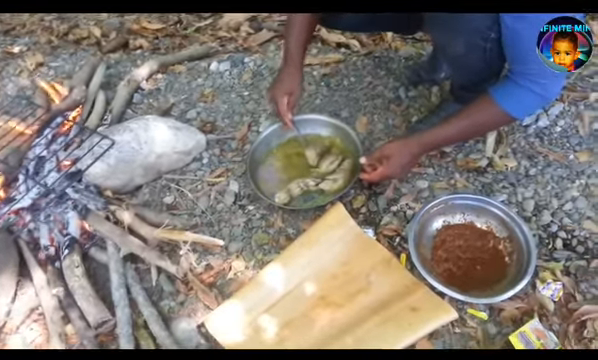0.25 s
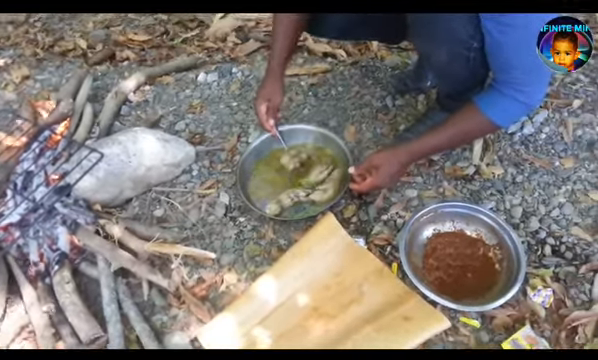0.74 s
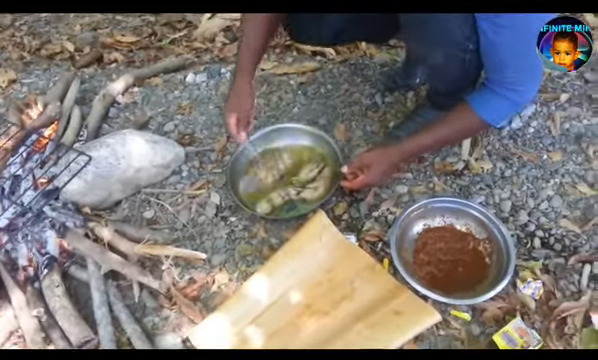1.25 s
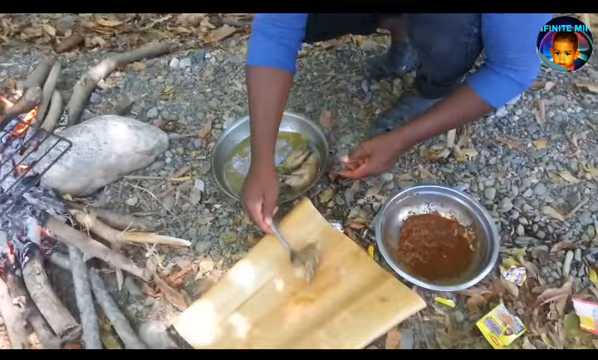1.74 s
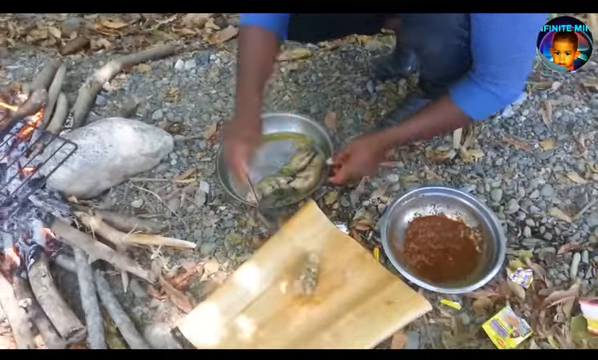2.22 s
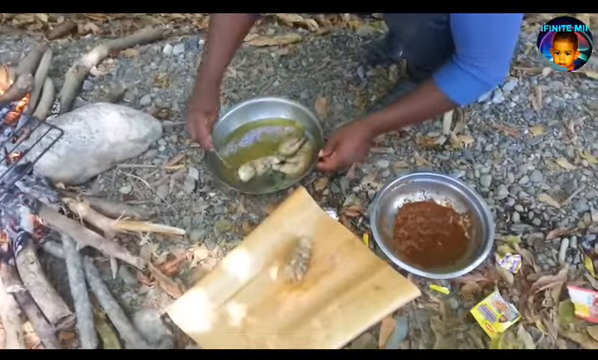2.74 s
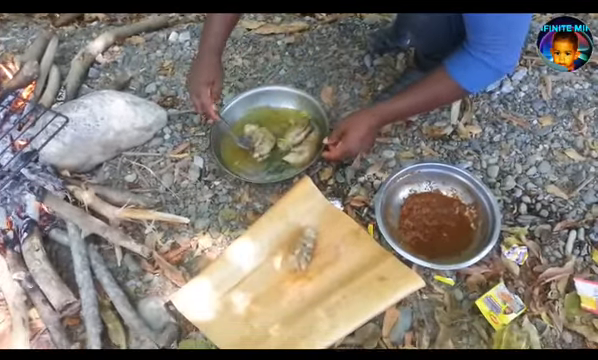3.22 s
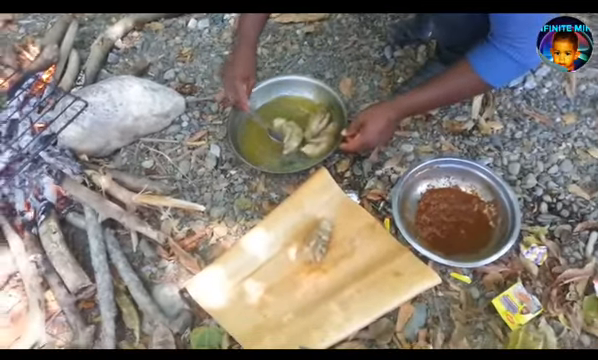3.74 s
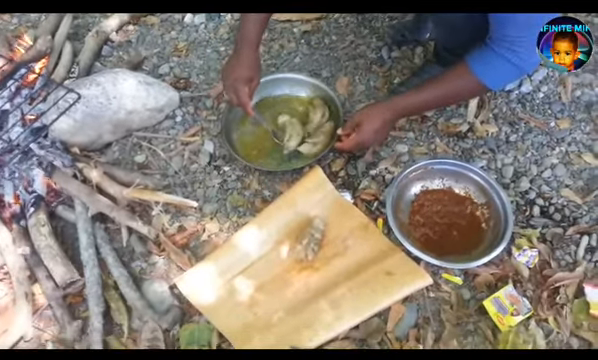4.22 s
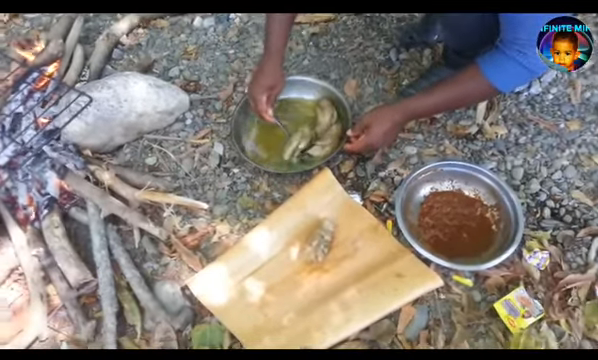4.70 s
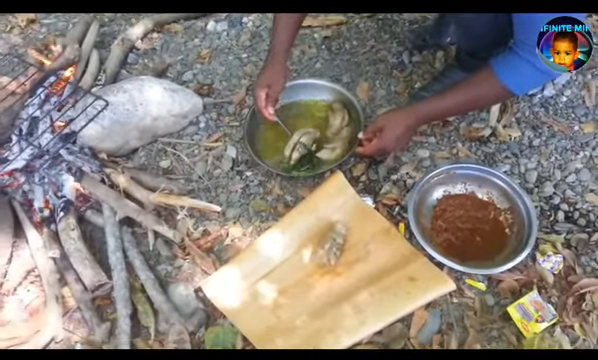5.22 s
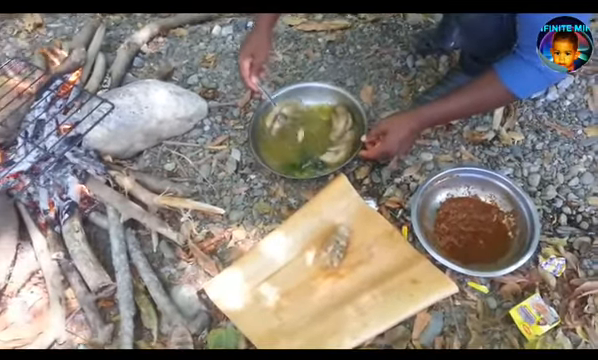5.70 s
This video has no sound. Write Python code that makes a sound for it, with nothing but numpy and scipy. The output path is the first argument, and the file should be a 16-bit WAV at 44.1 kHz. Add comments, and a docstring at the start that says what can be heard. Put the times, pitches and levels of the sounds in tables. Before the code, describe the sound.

Close stereo camera microphone, open air with faint scattered echoes. Early two-part bird whistles and small grip pops give way to a fork scraping and dull knocks as meat is set on wood. Short metallic bowl taps follow between two and a half and five seconds, with sparse dry fire crackles. Rough rubbing and one heavy handling knock sit hard left near the end, before raspy chirps.

```python
"""First a bird whistles up and down over a low outdoor rumble, and handling pops crackle on the left.
By a wood fire, a fork lifts cooked pork from a metal bowl of broth onto a board and goes back to stir.
Metal and wood ring as short fading sine waves, scrapes and rubbing are shaped noise, and birds are
gliding tones with echoes. The fire snaps as its splinters ring.
A noise suppressor lets the background swell up around the other sounds and sink between them."""
import sys
import numpy as np
from scipy import signal
from scipy.fft import rfft, irfft
from scipy.io import wavfile
from scipy.ndimage import uniform_filter1d

SR = 44100
rng = np.random.default_rng(int(sys.argv[2]) if len(sys.argv) > 2 else 0)


def file_out(sig):
    """Save sig as 16-bit WAV at sys.argv[1]."""
    # one column per channel
    cols = np.atleast_2d(sig).T
    # limit, then scale
    lim = np.clip(cols, -1, 1)
    pcm = np.round(lim * 32767).astype(np.int16)
    wavfile.write(sys.argv[1], SR, pcm)


N = 262836
TIME = np.arange(N) / SR  # seconds

# Levels in the tables go in before the filters, panning and echoes of each sound.
# Fork strikes on the bowl: (time [s], level before the bite factor [dB], decay time [ms],
# treble tilt [dB per octave])
FORK_STRIKES = [(2.5142, -11.5, 5.14, 0), (3.2972, -25, 1.6, -3.5), (3.6924, -14.5, 5.3, 1.4),
                (3.7096, -34, 3.8, 1), (4.3464, -29.5, 3.3, 2.5), (4.451, -29.5, 5, 9),
                (4.4597, -30, 5.3, 10), (4.473, -27, 7.8, 14), (4.64, -14, 0.87, 14)]
# Ringing modes of the bowl: (pitch [Hz], relative level [dB], time to fall 60 dB before damping [s])
BOWL_MODES = [(520, -9.5, 0.11), (760, -71, 0.095), (1290, 3.5, 0.061), (1800, 13, 0.013),
              (2120, -28, 0.023), (3097, -9.5, 0.47), (3600, -2, 0.011), (4047, 4.5, 0.048),
              (4040, 24, 0.053), (3900, -46.5, 0.0043), (5530, 14, 0.017), (5770, -63, 0.051),
              (6330, 9.5, 0.033), (6800, -1, 0.098), (8170, -1, 0.006), (10300, -35, 0.029)]
# Tone colour of fork touching bowl: (frequency [Hz], relative level [dB per Hz])
CONTACT_COLOUR = [(120, -37), (250, -13.5), (560, -10), (1000, -8), (1550, 1.5), (2500, -4.5), (3100, -5),
                  (4100, -13.5), (5100, -10.5), (6500, -5), (9000, -4.5), (12500, -2.5), (15000, -25)]
# Fork dragging through meat and over metal: (middle [s], half length [s], level [dB],
# treble tilt [dB per octave])
FORK_SCRAPES = [(.643, 0.016, -57, 5), (1.253, 0.022, -55.5, -9), (1.832, 0.029, -44, -4),
                (1.83, 0.0019, -42, -3.5), (1.914, 0.027, -46.5, -6), (2.195, 0.0099, -57.5, -3.5),
                (2.29, 0.012, -53, -2.5), (2.896, .013, -55, 0), (3.044, 0.013, -49, 16),
                (3.304, 0.02, -60.5, -.5), (3.891, 0.025, -62, 3), (3.997, 0.036, -61, -1),
                (4.351, 0.024, -57.5, -1), (4.468, 0.023, -45.5, 3)]
# Meat and fork landing and knocking, and the bowl rocking on the ground at 3.69 s: # (time [s], level [dB],
# pitch [Hz], ring decay time [ms])
LANDINGS = [(1.803, -18, 733, 1.83), (1.8066, -32.5, 202, 5.1), (1.8542, -19, 865, 0.36),
            (1.8553, -35, 336, 10.6), (1.9305, -32, 825, 1.7), (1.9507, -24.5, 440, 2.1),
            (3.693, -34.5, 596, 3.5), (4.076, -40.5, 300, 7.1)]

# Loud snaps of the fire: (time [s], level on the right [dB], main ring [Hz], left above right [dB])
LOUD_SNAPS = [(.637, -24.5, 8170, -2), (0.6497, -20, 11300, 9.5), (1.7167, -22.5, 11900, -13),
              (2.214, -32.5, 11300, 0), (2.9492, -43, 4600, 4), (3.0474, -36, 9800, -12),
              (4.6389, -24, 8070, -30), (5.6558, -31, 9350, 7.5), (5.8769, -28, 11100, 8)]
# Modes of a bursting splinter: (multiple of its main ring [1], relative level [dB], decay time [s])
SPLINTER_MODES = [(.4, -1.5, 0.00023), (.76, 6.5, 0.00011), (1, 3, 0.00064), (1.5, 8.5, 0.00024)]
# Faint snaps in between: how many, middle level, middle ring pitch, spread up and down
CRACKLE_PER_S, CRACKLE_DB, CRACKLE_HZ, CRACKLE_SPREAD_DB = 9.4, -51.5, 10200, 2.5
# Treble colour of each microphone port for near sounds: (frequency [Hz], level [dB])
LEFT_COLOUR = [(2500, -4), (4200, 5), (8000, 0), (9500, -15), (14000, -7.5)]
RIGHT_COLOUR = [(2500, 0.17), (4200, 5.2), (9500, 4.05), (11800, 1.17), (14000, 1.8)]

# Slips of the grip that pop: (time [s], spike level [dB], 1/e half width [ms])
GRIP_POPS = [(0.1637, -24, 0.28), (.203, -23.5, .44), (.223, -20.5, .36), (.2837, -15.5, 0.11),
             (.5487, -13.5, 0.11), (.812, -21.5, 0.34), (.814, -14, 0.083), (1.248, -25, 0.052),
             (4.2298, -28.5, 0.18), (4.834, -26.5, 0.7), (4.9013, -18, .29), (4.908, -17.5, 0.19),
             (4.941, -21.5, 0.075), (5.0366, -24, 0.38), (5.058, -18.5, 0.27), (5.0961, -14.5, 0.59),
             (5.1032, -4, 0.16), (5.1665, -28, 0.5), (5.3213, -25, 0.15), (5.4019, -20, 0.32),
             (5.485, -20.5, 0.29), (5.588, -26.5, 0.3), (5.7474, -28, .75)]
# Fingers rubbing the camera body in strokes: (middle [s], half length [s], level [dB])
RUB_STROKES = [(0.232, 0.11, -46.5), (0.64, 0.17, -61), (0.813, 0.017, -44), (4.458, 0.023, -57.5),
               (4.922, 0.046, -40.5), (5.06, 0.071, -44), (5.32, 0.31, -58)]
# Tone colour of the rubbing: (frequency [Hz], relative level [dB per Hz])
RUB_COLOUR = [(40, -11.5), (130, 7.5), (300, 2.5), (700, -3), (1500, -11.5), (3000, -28), (8000, -60.5)]
RUB_GRAINS_PER_S = 1000
# Hard slips that also knock the camera body: (time [s], level [dB])
BODY_KNOCKS = [(5.104, -9.5), (5.588, -34.5)]
# Dull modes of the camera body: (pitch [Hz], relative level [dB], decay time [s])
BODY_MODES = [(188, 5, 0.003), (513, 1.5, .002), (1000, 0, 0.00086)]

# A bird's two-part whistle: (rise start [s], rise length [s], rise level [dB],
# fall start [s], fall length [s], fall level [dB])
TWO_PART_WHISTLES = [(0.023, 0.14, -48, 0.17, 0.11, -47.5), (0.439, 0.097, -61, .56, 0.087, -51.5),
                     (0.793, 0.061, -53.5, 0.98, 0.086, -54.5)]
# The rise stops on a high held note, the fall on a low held note; roughness runs from 0 to 1
UP_HZ, UP_TOP_HZ, UP_OCT_PER_S, UP_ROUGH = 3150, 4110, 6.2, .17
DOWN_HZ, DOWN_END_HZ, DOWN_OCT_PER_S, DOWN_ROUGH = 3720, 2205, 10.5, 0.2
# Raspy chirps, a high note then a low one: (time [s], high note start [Hz], level [dB], roughness [0-1])
RASPY_CHIRPS = [(1.53, 2648, -53, 0.18), (1.983, 2550, -57, 0.13), (2.383, 2423, -57.5, 0.46),
                (5.684, 2774, -57, 0.15), (5.824, 2940, -52, 0.32), (5.926, 2784, -59, 0.48)]
CHIRP_NOTE_S, CHIRP_STEP_S, CHIRP_SAG_OCT = 0.044, 0.014, 0.034
LOW_NOTE_HZ, LOW_NOTE_DB = 2275, -2  # start pitch, and level relative to the high note
# Falling notes that a second bird answers: (time [s], start pitch [Hz], level [dB])
FALLING_NOTES = [(2.618, 3097, -56.5), (2.974, 3223, -55.5), (3.341, 3080, -57.5), (3.96, 2920, -68)]
FALL_S, FALL_OCT = 0.0484, 0.184
# Its rising answers: (time [s], length [s], start pitch [Hz], level [dB])
RISING_NOTES = [(2.81, 0.0705, 2690, -57), (3.171, 0.087, 2580, -68), (3.52, 0.1, 2700, -69),
                (3.788, 0.087, 3200, -66.5), (4.202, 0.071, 3230, -71.5), (4.659, .16, 3250, -71)]
RISE_OCT, SLUR_ROUGH = .13, 0.092
# Thin steady whistles from far away: (time [s], length [s], level [dB])
DISTANT_WHISTLES = [(3.056, .18, -85), (3.42, 0.17, -84)]
FAR_HZ = 5050

# Tone colour of the outdoor background: (frequency [Hz], relative level [dB per Hz])
AIR_COLOUR = [(18, -3), (35, -8.5), (70, 2.5), (150, 0.5), (300, -3.5), (520, -5.5), (1100, -11),
              (1800, -10.5), (2350, -7), (3200, -10), (5500, -15), (7300, -14.5), (13500, -15.5),
              (15000, -24)]
# Side balance of the background: (frequency [Hz], left above right [dB])
AIR_SIDES = [(60, -3), (300, 6), (1200, 5.5), (3000, 5.5), (6000, 0)]
# How alike the background is in both ports: (frequency [Hz], likeness [0-1])
AIR_LIKENESS = [(60, 0.71), (500, 0.27), (2000, 0), (4500, 0), (7000, 1)]
# Background level with the suppressor open: (time [s], level [dB])
AIR_LEVEL = [(0, -51.5), (1.3, -56), (2, -53.5), (4.6, -53), (5.1, -56), (5.9, -54.5)]
EDGE_HZ = 14800  # top of the recorder's band


def amp(db):
    """Turns decibels into a multiplier."""
    return 10 ** (np.asarray(db) / 20)


def evened(x):
    """Scales a sound to an average strength (rms) of 1."""
    return x / np.sqrt(np.mean(x ** 2) + 1e-20)


def read(points, hz):
    """Reads between the rows of a table, with frequency spaced as in hearing (logarithmic)."""
    f, value = np.transpose(points)
    return np.interp(np.log(hz + 1), np.log(f + 1), value)


def colour(x, points, tilt_db=0):
    """Filters a sound by a table, with a treble tilt in dB per octave around 4000 Hz."""
    hz = np.fft.rfftfreq(x.shape[-1], 1 / SR)
    octaves = np.log2(np.maximum(hz, 300) / 4000)
    gain = amp(read(points, hz) + tilt_db * octaves)
    return irfft(rfft(x) * gain, x.shape[-1])


def filtered(x, hz, kind):
    """Keeps only part of the frequency range, with gentle edges."""
    return signal.sosfilt(signal.butter(2, hz, kind, fs=SR, output="sos"), x)


def pan(balance_db):
    """Left and right multipliers that place a sound to one side."""
    return amp([[balance_db / 2], [-balance_db / 2]])


def add(mix, s, sound):
    """Mixes a sound in at time s (seconds)."""
    part = mix[..., max(round(s * SR), 0):][..., :sound.shape[-1]]
    part += sound[..., :part.shape[-1]]


def swell(t, middle, half):
    """The rounded rise and fall of one stroke."""
    return np.exp(-abs((t - middle) / half) ** 3)


def echoes(x, t60, rise, per_s=3000):
    """Separate reflections that build up and die away, unrelated in the two ports."""
    t = TIME[:SR]
    signs = rng.choice([-1., 1.], (2, SR))
    taps = signs * (rng.random((2, SR)) < per_s / SR)
    tail = taps * 10 ** (-3 * t / t60) * (1 - np.exp(-t / rise))
    tail /= np.linalg.norm(tail, axis=1, keepdims=True)
    return signal.fftconvolve(np.atleast_2d(x), tail, axes=1)[:, :N]


def clinks(ring_db=-2, side_db=6.5, bite=0.31):
    """The tines chatter on the bowl for a few milliseconds and set it ringing; bite scales the level."""
    out, t = np.zeros((2, N)), TIME[:SR // 5]
    for s, db, decay_ms, tilt_db in FORK_STRIKES:
        contact = (1 - np.exp(-t / .0004)) * np.exp(-1000 * t / decay_ms)
        noise = rng.standard_normal((2, len(t)))
        chatter = evened(colour(noise, CONTACT_COLOUR, tilt_db)) * contact
        ring = amp(ring_db) * chatter.std() * evened(bowl_ring(chatter))
        add(out, s, bite * amp(db) * (chatter + ring))
    return pan(side_db) * out


def bowl_ring(x, damping=4.6):
    """The bowl's modes, deadened by broth and meat; each port hears them in its own phase."""
    t = TIME[:SR // 5]
    ring = np.zeros((2, len(t)))
    for hz, db, t60 in BOWL_MODES:
        fading = amp(db - 60 * t * damping / t60)  # damping shortens the ring
        ring += fading * np.sin(2 * np.pi * (hz * t + rng.random((2, 1))))
    return signal.fftconvolve(x, ring, axes=1)[:, :x.shape[1]]


def scrapes(ring_db=-6, side_db=5.0):
    """Each stroke is a run of tiny uneven slips that also stir the bowl's modes."""
    out, t = np.zeros((2, N)), TIME[:SR // 4]
    middle = t.mean()
    for s, half, db, tilt_db in FORK_SCRAPES:
        # the strength jumps every 60 samples
        steps = np.clip(rng.standard_normal(len(t)), -2, 2)
        grains = amp(4.5 * np.repeat(steps, repeats=60)[:len(t)])
        noise = rng.standard_normal((2, len(t)))
        slips = evened(colour(noise * grains, CONTACT_COLOUR, tilt_db))
        sound = evened(slips + amp(ring_db) * evened(bowl_ring(slips)))
        add(out, s - middle, amp(db) * sound * swell(t, middle, half))
    return pan(side_db) * out


def thuds(slap_db=-11, slap_time=0.0007, slap_tilt_db=-5, side_db=6.0, low_hz=130):
    """A quickly damped ring under a short wet slap, with no deep bass."""
    out, t = np.zeros(N), TIME[:SR // 10]
    for s, db, hz, ring_ms in LANDINGS:
        body = np.sin(2 * np.pi * hz * t) * np.exp(-1000 * t / ring_ms)
        noise = evened(colour(rng.standard_normal(len(t)), CONTACT_COLOUR, slap_tilt_db))
        slap = noise * np.exp(-t / slap_time)
        add(out, s, amp(db) * (body + amp(slap_db) * slap))
    return pan(side_db) * filtered(out, low_hz, "high")


def fire(rise=0.0002, fizz_db=-25, fizz_time=0.0025):
    """Burning wood bursts: a splinter rings for an instant and a puff of steam fizzes longer."""
    out, t = np.zeros((2, N)), TIME[:SR // 20]
    for s, db, hz, side_db in LOUD_SNAPS + crackle():
        ring = np.zeros((2, len(t)))
        for multiple, mode_db, decay in SPLINTER_MODES:
            wave = np.sin(2 * np.pi * (hz * multiple * t + rng.random((2, 1))))
            ring += amp(mode_db) * np.exp(-t / decay) * wave
        fizz = amp(fizz_db) * rng.standard_normal((2, len(t))) * np.exp(-t / fizz_time)
        add(out, s, amp([[db + side_db], [db]]) * (ring + fizz) * (1 - np.exp(-t / rise)))
    return out


def crackle():
    """Faint snaps of burning wood at random moments, as rows like those of LOUD_SNAPS."""
    waits, sizes, rings, sides = rng.random((60, 4)).T
    times = np.cumsum(-np.log(1 - waits)) / CRACKLE_PER_S
    levels = CRACKLE_DB + CRACKLE_SPREAD_DB * (2 * sizes - 1)
    pitches = CRACKLE_HZ * (1 + 0.36 * (rings - .5))
    return [row for row in zip(times, levels, pitches, 10 * sides) if row[0] < N / SR]


def handling(low_hz=160, top_hz=3200, lift_db=3, leak_db=-38):
    """Rubbing and small slips beside the left port: pressure spikes that rebound as the port leaks."""
    spikes, t = np.zeros(N), TIME[:SR // 50]
    middle = t.mean()
    for s, db, width_ms in GRIP_POPS:
        add(spikes, s - middle, amp(db) * np.exp(-1000 * abs(t - middle) / width_ms))
    pops = amp(lift_db) * filtered(spikes, [low_hz, top_hz], "band")
    grit = rng.standard_normal(N) * (rng.random(N) < RUB_GRAINS_PER_S / SR)
    strokes = sum(amp(db) * swell(TIME, s, half) for s, half, db in RUB_STROKES)
    rub = evened(colour(grit, RUB_COLOUR)) * strokes
    return amp([[0], [leak_db]]) * (pops + rub + knocks())  # the right port hears very little


def knocks():
    """The camera body's short dull ring, made of a few fading sine waves."""
    out, t = np.zeros(N), TIME[:SR // 10]
    ring = sum(amp(db) * np.sin(2 * np.pi * hz * t) * np.exp(-t / decay) for hz, db, decay in BODY_MODES)
    for s, db in BODY_KNOCKS:
        add(out, s, amp(db) * ring)
    return filtered(out, 70, "high")


def birds(direct_db=-3.5, near_db=-4.0, far_db=-7.0, flutter=0.17, side_db=8.5,
          distance_loss=0.16, taper=0.44):
    """Gliding whistles, some raspy, scattered by trunks and leaves; faint birds arrive mostly as echoes."""
    song, direct = np.zeros((2, N))
    nearest_db = max(row[2] for row in TWO_PART_WHISTLES)
    for s, hz, db, rough in syllables():
        # a rasp is a fast random wobble of the pitch
        rasp = evened(uniform_filter1d(rng.standard_normal(SR), size=70))[:len(hz)]
        turns = np.cumsum(hz * (1 + flutter * rough * rasp)) / SR
        tone = np.sin(2 * np.pi * turns) * signal.windows.tukey(len(hz), taper)
        note = amp(db) * evened(tone)
        add(song, s, note)
        add(direct, s, note * amp(distance_loss * (db - nearest_db)))
    near_trees = amp(near_db) * echoes(song, t60=0.21, rise=0.055, per_s=710)
    far_trees = amp(far_db) * echoes(song, t60=0.34, rise=0.012)
    return pan(side_db) * (amp(direct_db) * direct + near_trees + far_trees)


def syllables():
    """Gives every bird note as (time [s], pitch curve [Hz], level [dB], roughness [0-1])."""
    for up_s, up_length, up_db, down_s, down_length, down_db in TWO_PART_WHISTLES:
        up, down = TIME[TIME < up_length], TIME[TIME < down_length]
        rise = np.minimum(UP_HZ * 2 ** (UP_OCT_PER_S * up), UP_TOP_HZ)
        fall = np.maximum(DOWN_HZ * 2 ** (-DOWN_OCT_PER_S * down), DOWN_END_HZ)
        yield up_s, rise, up_db, UP_ROUGH
        yield down_s, fall, down_db, DOWN_ROUGH
    for s, hz, db, rough in RASPY_CHIRPS:
        yield s, glide(CHIRP_NOTE_S, hz, -CHIRP_SAG_OCT), db, rough
        low_note = glide(CHIRP_NOTE_S, LOW_NOTE_HZ, -CHIRP_SAG_OCT)
        yield s + CHIRP_STEP_S, low_note, db + LOW_NOTE_DB, rough
    for s, hz, db in FALLING_NOTES:
        yield s, glide(FALL_S, hz, -FALL_OCT), db, SLUR_ROUGH
    for s, length, hz, db in RISING_NOTES:
        yield s, glide(length, hz, RISE_OCT), db, SLUR_ROUGH
    for s, length, db in DISTANT_WHISTLES:
        yield s, glide(length, FAR_HZ, 0), db, SLUR_ROUGH / 2


def glide(length, start_hz, octaves):
    """A pitch that slides evenly by so many octaves."""
    return start_hz * 2 ** np.linspace(0, octaves, int(length * SR))


def air():
    """Outdoor rumble and the hiss of fire and leaves, as coloured noise that differs between the ports."""
    hz = np.fft.rfftfreq(N, 1 / SR)
    first, other = rfft(rng.standard_normal((2, N)))
    same = np.clip(read(AIR_LIKENESS, hz), -1, 1)
    side = amp(read(AIR_SIDES, hz) / 2)
    left = first * side
    right = (same * first + np.sqrt(1 - same ** 2) * other) / side
    noise = irfft(np.array([left, right]), N)
    level_db = np.interp(TIME, *np.transpose(AIR_LEVEL))
    return evened(colour(noise, AIR_COLOUR)) * amp(level_db)


def suppressor(sound, open_db=-43, slope=0.59, depth_db=17, release=0.005):
    """Gain left on the background: it opens with the power of the sound and shuts soon after."""
    power = abs(uniform_filter1d((sound ** 2).mean(0), size=400))
    keep = np.exp(-1 / (release * SR))
    smooth_power = signal.lfilter([1 - keep], [1, -keep], power)
    level_db = 10 * np.log10(smooth_power + 1e-12)
    opening = amp(np.minimum(slope * (level_db - open_db), 0))
    gain = np.hypot(opening, amp(-depth_db))  # never fully shut
    return uniform_filter1d(gain, size=500)


def scene(yard_db=-20):
    """Near sounds get a faint outdoor echo; the background swells with all the other sounds."""
    left, right = clinks() + scrapes() + thuds() + fire()
    near = np.array([colour(left, LEFT_COLOUR), colour(right, RIGHT_COLOUR)])
    yard = amp(yard_db) * echoes(near, t60=0.22, rise=0.0023)
    sounds = near + yard + birds() + handling()
    return sounds + air() * suppressor(sounds)


def record(dry):
    """The recorder's band limit: a steep filter takes away the highest treble."""
    low_pass = signal.firwin(401, EDGE_HZ, window=("kaiser", 9), fs=SR)
    return signal.oaconvolve(dry, low_pass[None], "same")


dry = scene()
out = record(dry)
file_out(out)
```